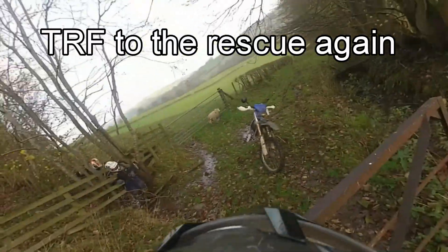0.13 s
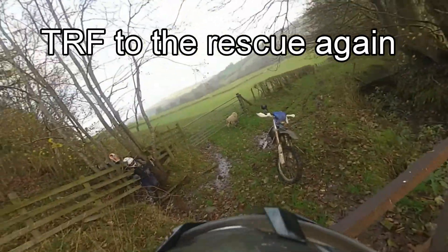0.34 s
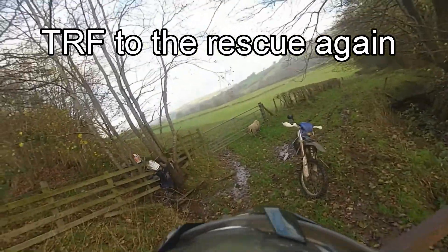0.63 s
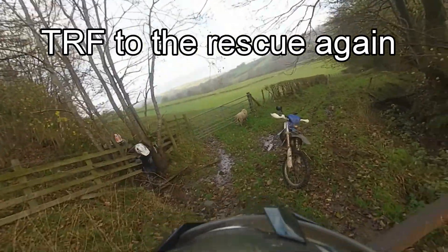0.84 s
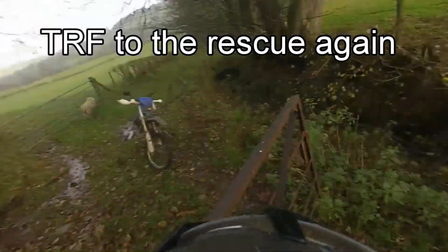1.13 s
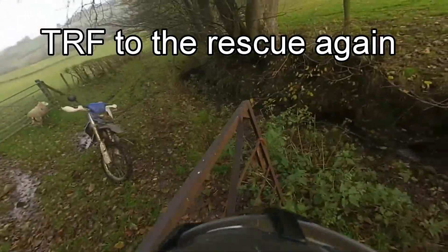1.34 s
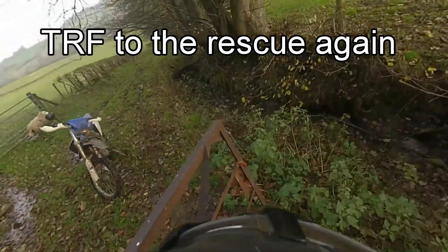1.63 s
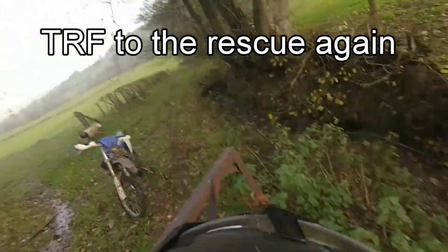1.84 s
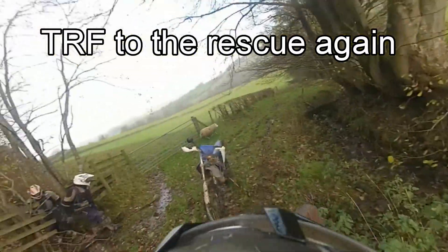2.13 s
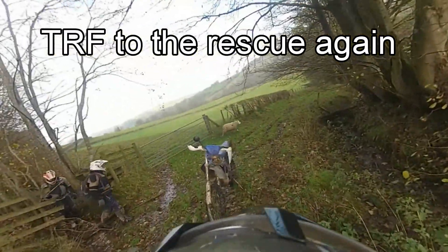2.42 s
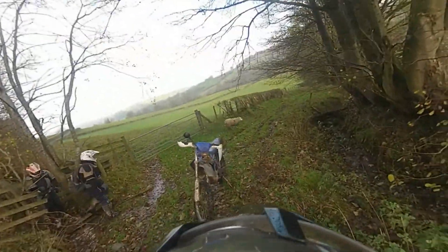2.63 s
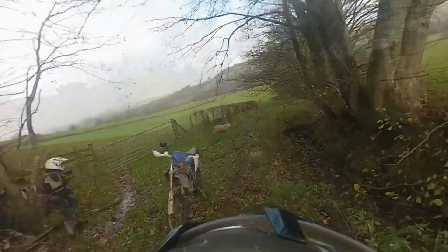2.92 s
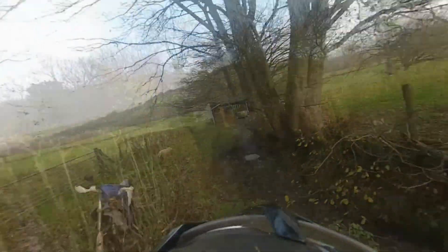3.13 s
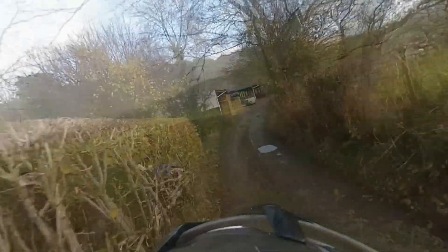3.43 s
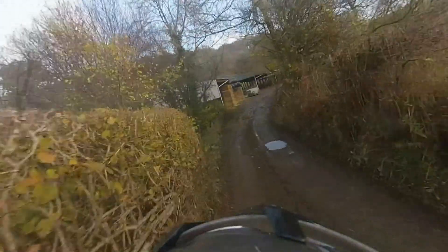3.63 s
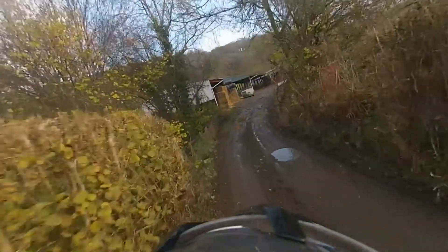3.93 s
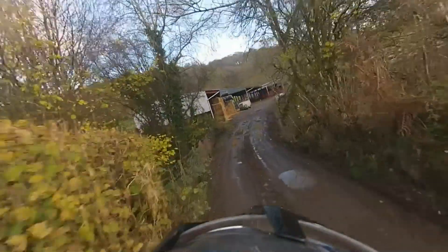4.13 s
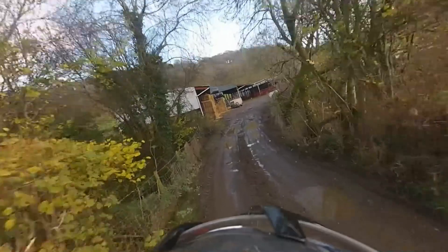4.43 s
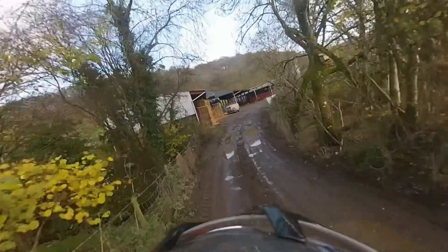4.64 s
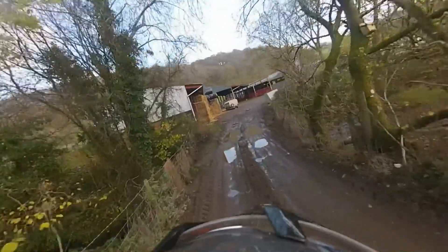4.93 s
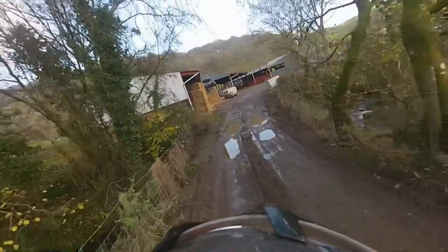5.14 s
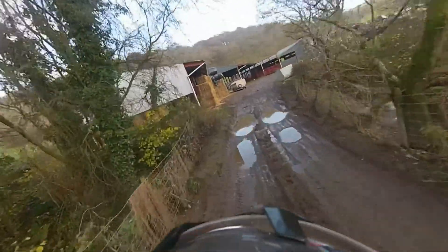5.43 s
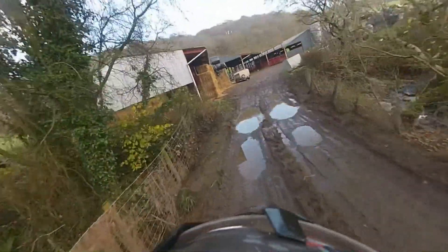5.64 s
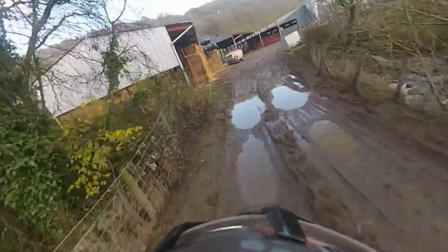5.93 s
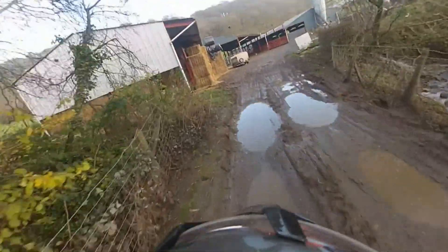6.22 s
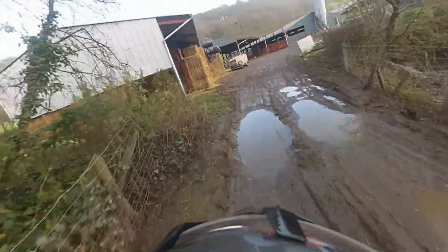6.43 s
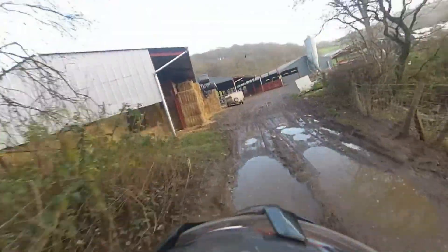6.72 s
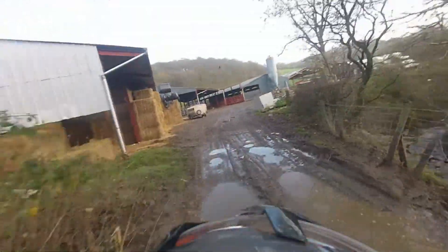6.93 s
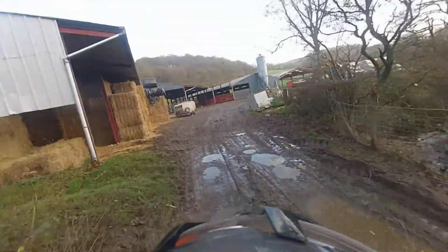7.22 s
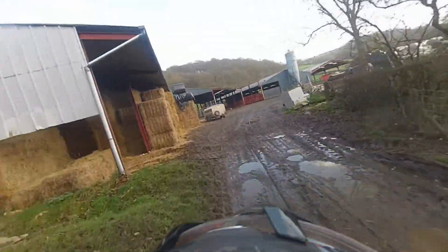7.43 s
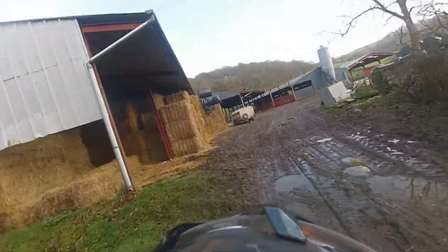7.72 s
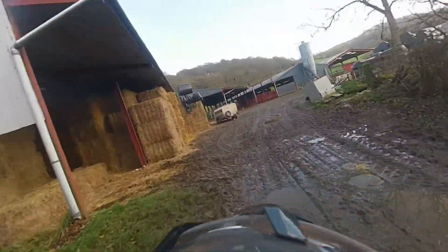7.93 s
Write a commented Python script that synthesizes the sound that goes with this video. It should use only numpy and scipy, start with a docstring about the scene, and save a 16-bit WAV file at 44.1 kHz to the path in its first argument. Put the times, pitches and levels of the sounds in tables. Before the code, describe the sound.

Lumpy motorcycle idle with soft clatter for three seconds, then quickening puffs, tyre rumble and a deepening, laboring low-speed chug.

```python
"""A single-cylinder four-stroke trail motorcycle idles unevenly, then pulls away and chugs along a wet farm track.
Each firing sends pressure waves down the pipe, as a double puff under load; weak firings break the beat.
Knocks and ticks at fixed points of the engine cycle ring the case, and noise pulsing with them is the clatter.
Tyre rumble and wind grow as the bike pulls away; gusts, rattles and jolts come at set times.
A helmet camera in a closed housing hears it all, muffled."""
import sys
import numpy as np
from scipy import signal
from scipy.fft import rfft, irfft, next_fast_len
from scipy.io import wavfile

SR = 44100
rng = np.random.default_rng(int(sys.argv[2]) if len(sys.argv) > 2 else 0)


def wav_record(signal):
    """Record a signal, one row per channel, as 16-bit PCM in the file named by sys.argv[1]."""
    frames = np.transpose(np.atleast_2d(signal))
    bounded = np.clip(frames, -1, 1)
    # unit amplitude maps onto the largest positive 16-bit level
    quanta = np.round(bounded * 32767).astype(np.int16)
    wavfile.write(sys.argv[1], SR, quanta)


N = 355887
TIME = np.arange(N) / SR

# Engine speed. Each row: time in seconds, firings per second.
ENGINE_SPEED = [(0.0, 16.22), (0.5, 17.23), (1.0, 17.17), (1.32, 15.6), (1.5, 16.28), (3.14, 16.97),
                (3.2, 16.37), (3.38, 20.38), (4.5, 20.56), (4.64, 19.9), (5.12, 19.93), (5.42, 18.79),
                (5.52, 19.42), (6.28, 18.01), (6.78, 18.47), (7.04, 16.79), (7.46, 17.68), (8.07, 17.14)]
# Firings that burn badly. Each row: time in seconds, change of strength in dB.
WEAK_FIRINGS = [(0.11, -4), (0.41, -7), (0.64, -3.1), (0.7, -6.5), (0.93, -6), (1.23, -9), (1.35, -16),
                (2.03, -9), (2.39, -15), (2.93, -5.1), (3.43, -8), (3.73, -9), (3.83, -3.5), (3.97, -6.5),
                (4.12, -6.5), (4.22, -3), (4.31, -3), (4.51, -4.5), (4.71, -7), (5.01, -4.5), (5.11, -4),
                (5.37, -5), (5.94, -3), (6.16, -4.5), (6.33, -1.5), (6.66, -3), (6.93, -3.5)]
# The rider's hand. Each row: time in seconds, exhaust level in dB with the throttle open,
# lugging from 0 (light) to 1 (hard).
THROTTLE = [(3.0, -31, 0), (3.25, -36.5, 0), (3.55, -33, 0.04), (4.0, -30, 0), (5.0, -30, 0.09),
            (5.6, -31, 0.03), (6.2, -28.5, 0.37), (6.8, -25.5, 0.59), (7.12, -27, 0.43), (7.3, -25, 0.73),
            (7.9, -26, 0.83), (8.07, -27, 0.85)]
# Pressure waves of one idle firing, in order. Each entry: average height, the first being 1.
IDLE_WAVES = [1, 0.4, 0.6, 0.35, 0.22]
# Sharp waves that bark at idle. Each row: delay after the first in seconds, relative level in dB.
BARK_WAVES = [(0, 3.5), (.0091, 1.5), (0.016, -11.5)]
# Puffs of one firing under load: a puff of intake just before, blow-down, the piston's push, a last gasp. Each
# row: place as a share of the engine cycle, relative level in dB.
PUFFS = [(-.13, -16.5), (0, 0.5), (.248, -1.5), (0.484, -14.5)]
# Parts that meet in each engine cycle. Each row: place as a share of the cycle (above one half it
# falls before the firing time), then relative levels in dB: knock at idle, knock under load, tick.
CONTACTS = [(.69, -7.5, -13, 4.5), (.75, -4.5, -10.5, -5.5), (.83, -6.5, -17, -2), (0.0996, -5, -9.5, 2.5),
            (.33, -5, -6.5, -7)]
# Clatter of engine and chain. Each row: time in seconds, level in dB.
CLATTER_LEVEL = [(0, -54), (2.95, -53.5), (3.8, -46), (4.8, -44.5), (5.55, -47), (6.3, -45), (6.8, -42),
                 (7.3, -44), (7.8, -39.5), (8.07, -43)]
# Small rattles of the bike. Each row: time in seconds, level in dB before a shared cut, decay in seconds.
RATTLES = [(1.629, -35, 0.0061), (1.65, -40, .01), (1.668, -40.5, .014), (4.973, -34, 0.0074),
           (5.3009, -35, .012), (7.0504, -27, .005), (7.791, -32, 0.015)]
# Jolts over ruts. Each row: time in seconds, level in dB.
JOLTS = [(7.632, -23), (7.787, -20)]
# Gusts on the helmet. Each row: time of the peak in seconds, half-length in seconds, peak level in dB.
GUSTS = [(1.057, 0.093, -45), (2.22, .05, -51), (4.75, 1.0, -39.5)]

# Resonances: tones that ring when struck. Each row: pitch in Hz, width in Hz, relative level in dB.
# The pipe at idle, then the idle bark and the broad band that shapes it:
IDLE_MODES = [(78, 21, 7.5), (141, 45, 3.5), (216, 34, -8.5)]
BARK_MODES = [(426, 96, 0), (518, 76, -1)]
BARK_BAND = [(482, 270, 0)]
# The exhaust pulling lightly, the exhaust lugging hard, and its rushing gas (same columns):
LIGHT_MODES = [(89.4, 45, -9), (170.5, 37.5, -1), (260.5, 53, -1.5), (314, 40, -3), (466, 33, -10.5)]
LUG_MODES = [(86, 60, -4.5), (140, 73, -6.5), (241.3, 48.4, 4.5), (293.4, 94, -1), (454, 160, -11)]
GAS_MODES = [(352, 50, 1), (481, 32, 2.5), (583, 96, -9)]
# The engine case, the bright valve ticks, the loose parts and the jolted frame (same columns):
CASE_MODES = [(463, 35, -4.5), (551, 30, 0.5), (621.6, 54, -8), (844, 51, -14.5)]
TICK_MODES = [(1870, 690, 3.5), (2850, 340, 11)]
RATTLE_MODES = [(1380, 440, 8.2), (2000, 600, 2.5), (2580, 200, 9.6), (4040, 850, 2)]
JOLT_MODES = [(250.3, 140, 4), (470, 170, -1), (900, 300, -22)]

# Noise colours. Each row: frequency in Hz, relative strength there in dB.
# Clatter at a standstill, clatter when rolling, ground rumble, and wind:
IDLE_CLATTER = [(500, 6), (900, -3.5), (1200, 4), (1600, -3), (2100, 3), (2500, -2), (2850, 0), (3300, -4),
                (4500, -5), (5500, -9.5), (7000, -30)]
ROLL_CLATTER = [(500, -23), (900, -9.5), (1300, 3.5), (1550, -0.5), (2100, 2.5), (2500, 1), (2850, 7.5),
                (3400, -2), (4700, -1.5), (5500, -9), (7000, -37)]
RUMBLE = [(30, -78), (70, -9), (120, -1.5), (170, -0.5), (300, -3.5), (400, -3), (500, -11.5), (650, -12.5),
          (800, -20), (1200, -27.5)]
WIND = [(12, -5), (25, -13), (42, -1.5), (65, -7), (130, -11), (400, -41)]

# The throttle opens and the bike gets rolling: start and length (s)
OPEN_S, OPENING_S = 2.755, 0.84
ROLL_OFF_S, GATHERING_S = 2.84, 0.65
# Chance spread of every firing (dB)
FIRING_SPREAD_DB = .5
# Under load each firing makes up for this share of the last one's lack or excess, so the beat see-saws
REBOUND = 0.33
# Rate of the pipe's bouncing waves (Hz), and turbulence in the pipe (0-1), both at idle
IDLE_PIPE_HZ, RAGGED_IDLE = 133.1, 0.39
# Hollow beat at idle, the change of beat and bark as the throttle opens, and engine knock (dB)
BEAT_DB, BEAT_OPEN_DB, KNOCK_DB = -34, -13, -41.5
# Chance spread of the puffs in time (s) and level (dB)
PUFF_JITTER_S, PUFF_SPREAD_DB = .00018, .7
# Above the idle rate (firings per s) the puffs come earlier (s for each extra firing per s)
IDLE_RATE, ADVANCE_S = 17.0, 0.00187
# Ground rumble at a standstill, the tyre rumble added under way, and air on the helmet when riding (dB)
STANDING_RUMBLE_DB, TYRES_DB, RIDE_WIND_DB = -45.5, -36, -45
# The camera's mirror point and top limit (Hz)
MIRROR_HZ, CUTOFF_HZ = 12000, 15400


def from_db(db):
    """Turn decibels into gain."""
    return 10 ** (np.asarray(db) / 20)


def rms_one(x):
    """Scale to an rms (average strength) of 1."""
    return x / np.sqrt(np.mean(x ** 2) + 1e-20)


def in_time(rows):
    """Draw each column of a timed table as a smooth line, sample by sample."""
    s, *columns = np.transpose(rows)
    return [np.interp(TIME, s, column) for column in columns]


def ramp(start_s, length_s):
    """Rise evenly from 0 to 1."""
    return np.clip((TIME - start_s) / length_s, 0, 1)


def opening():
    """How far the throttle is open, 0-1."""
    return ramp(OPEN_S, OPENING_S)


def rolling():
    """How far the bike has got under way, 0-1."""
    return ramp(ROLL_OFF_S, GATHERING_S)


def low_pass(x, hz, order=2):
    """Take away the sound above a frequency (Butterworth filter)."""
    return signal.sosfilt(signal.butter(order, min(hz, .45 * SR), fs=SR, output="sos"), x)


def drift(hz):
    """Slow random wandering with a spread of 1."""
    settling = SR  # the filter's first second is thrown away
    return rms_one(low_pass(rng.standard_normal(N + settling), hz)[settling:])


def noise(colour):
    """Random noise of rms 1 with a given spectrum."""
    hz, db = np.transpose(colour)
    size = next_fast_len(N)
    bins_hz = np.maximum(np.arange(size // 2 + 1) * SR / size, 1)
    gain = from_db(np.interp(np.log(bins_hz), np.log(hz), db, right=-120))
    spectrum = rfft(rng.standard_normal(size)) * gain
    return rms_one(irfft(spectrum, size)[:N])


def clicks(times, sizes):
    """Single-moment clicks, each shared between its two nearest samples."""
    at = np.clip(np.ravel(times) * SR, 0, N)
    first, sizes = at.astype(int), np.ravel(sizes)
    early = np.bincount(first, sizes * (1 - at + first), N + 2)
    late = np.bincount(first + 1, sizes * (at - first), N + 2)
    return (early + late)[:N] + 1e-18


def ringing_poles(hz, width_hz):
    """Filter numbers of one resonance, and how much it keeps from sample to sample."""
    r = np.exp(-np.pi * width_hz / SR)
    return [1, -2 * r * np.cos(2 * np.pi * hz / SR), r * r], r


def resonate(x, modes):
    """Ring several resonances side by side, with alternating signs."""
    out = 0
    for k, (hz, width_hz, db) in enumerate(modes):
        poles, r = ringing_poles(hz, width_hz)
        gain = (-1) ** k * from_db(db) * (1 - r * r) / 2
        out = out + gain * signal.lfilter([1, 0, -1], poles, x)
    return out


def disperse(x, hz, width_hz):
    """The silencer chambers delay one band more than the rest: waves spread but keep their colour."""
    poles, _ = ringing_poles(hz, width_hz)
    return signal.lfilter(poles[::-1], poles, x)


def fade(x, seconds):
    """Give every click a tail that dies away exponentially."""
    return signal.lfilter([1], [1, -np.exp(-1 / (seconds * SR))], x)


def trail(x, seconds):
    """A dying puff of noise after every click."""
    return fade(x, seconds) * rng.standard_normal(N) / np.sqrt(seconds * SR)


def firings():
    """Time, cycle length and strength of each firing; under load a weak one leaves fuel for the next."""
    rate, = in_time(ENGINE_SPEED)
    cycles = np.cumsum(rate) / SR
    times = np.interp(np.arange(150) + .75, cycles, TIME, right=N / SR)
    db = rng.normal(0, FIRING_SPREAD_DB, len(times))
    for s, weak_db in WEAK_FIRINGS:
        db[np.argmin(abs(times - s))] += weak_db
    rebound = np.clip(REBOUND, 0, .9) * np.interp(times, TIME, opening())
    for k in range(1, len(times)):
        db[k] -= rebound[k] * db[k - 1]
    strength = from_db(db) * (times < TIME[-1])  # firings past the end are silent
    return times, 1 / np.interp(times, TIME, rate), strength


def pipe_waves(times, heights, scatter=.05, gas_noise=.45, gas_s=.003):
    """Each blow-down bounces along the pipe; turbulence shifts the waves and trails them with noise."""
    trips_s = np.exp(scatter * RAGGED_IDLE * rng.standard_normal(heights.shape)) / IDLE_PIPE_HZ
    arrivals = times[:, None] + np.cumsum(trips_s, axis=1) - trips_s[:, :1]
    sizes = heights * np.exp(.2 * RAGGED_IDLE * rng.standard_normal(heights.shape))
    waves = clicks(arrivals, sizes)
    return waves + gas_noise * RAGGED_IDLE * trail(waves, gas_s)


def idle_beat(times, strength, lead_s=0.00312):
    """The hollow beat of a closed throttle: bouncing waves ring the pipe, softer as the throttle opens."""
    waves = pipe_waves(times - lead_s, np.outer(strength, IDLE_WAVES))
    beat = rms_one(low_pass(resonate(waves, IDLE_MODES), hz=416, order=4))
    return from_db(BEAT_DB + BEAT_OPEN_DB * opening()) * beat


def idle_bark(times, strength, lead_s=0.00221, jitter_s=.0001, level_db=-41):
    """The first, sharp waves of an idle firing ring higher up as a bark, softer as the throttle opens."""
    delay_s, db = np.transpose(BARK_WAVES)
    at = times[:, None] - lead_s + delay_s + rng.normal(0, jitter_s, (len(times), len(db)))
    waves = clicks(at, strength[:, None] * from_db(db))
    bark = resonate(resonate(waves, BARK_MODES), BARK_BAND)
    return from_db(level_db + BEAT_OPEN_DB * opening()) * rms_one(low_pass(bark, hz=700, order=4))


def engine_contacts(times, cycle_s, jitter_s=.0005, spread_db=1.4):
    """Piston slap and valve seating recur at fixed crank angles: clicks for dull knocks and bright ticks."""
    share, idle_db, load_db, tick_db = np.transpose(CONTACTS)
    shape = (len(times), len(share))
    nearest_share = share - np.round(share)
    at = times[:, None] + cycle_s[:, None] * nearest_share + rng.normal(0, jitter_s, shape)
    sizes = from_db(rng.normal(0, spread_db, shape)) * (times < TIME[-1])[:, None]
    opened = np.interp(times, TIME, opening())[:, None]
    knock_db = idle_db + opened * (load_db - idle_db)
    return clicks(at, sizes * from_db(knock_db)), clicks(at, sizes * from_db(tick_db))


def engine_knock(contacts, chatter=.35, chatter_s=.005):
    """The contacts chatter briefly and ring the engine case."""
    blows = contacts + chatter * trail(contacts, chatter_s)
    return from_db(KNOCK_DB) * rms_one(low_pass(resonate(blows, CASE_MODES), hz=1030, order=4))


def valve_ticks(contacts, tick_db=-59.5):
    """The contacts also give a short bright rasp of ringing noise."""
    rasp = fade(abs(contacts), .007) * rng.standard_normal(N)
    return from_db(tick_db) * rms_one(resonate(rasp, TICK_MODES))


def clatter(contacts, swell_s=0.024, idle_swell=0.45, roll_swell=0.64, grain_db=1.0):
    """Gear hiss pulses with the engine; once rolling, chain and wet grit give a grainier noise."""
    clatter_db, = in_time(CLATTER_LEVEL)
    beat = rms_one(fade(abs(contacts), swell_s))
    standing = rms_one(noise(IDLE_CLATTER) * np.hypot(1, idle_swell * beat))
    grain = from_db(grain_db * drift(hz=164))
    moving = rms_one(noise(ROLL_CLATTER) * np.hypot(1, roll_swell * beat) * grain)
    # square roots keep the power steady while one noise replaces the other
    return from_db(clatter_db) * (np.sqrt(1 - rolling()) * standing + np.sqrt(rolling()) * moving)


def ground_rumble(bump_db=1.5):
    """Low, bumpy noise from the ground; knobbly tyres add to it as the bike gets under way."""
    level = from_db(STANDING_RUMBLE_DB) + rolling() * from_db(TYRES_DB)
    return level * rms_one(noise(RUMBLE) * from_db(bump_db * drift(hz=25)))


def wind(gust_db=-4.5):
    """Air buffets the helmet as low, wavering noise, in gusts and as the bike moves."""
    gusts = sum(from_db(db) * np.exp(-((TIME - s) / half_s) ** 2) for s, half_s, db in GUSTS)
    air = rolling() * from_db(RIDE_WIND_DB) + gusts
    return air * rms_one(noise(WIND) * from_db(gust_db * drift(hz=4.2)))


def rattles(level_db=-9):
    """Loose parts clack and scuff: short fading bursts of ringing noise."""
    shake = sum(fade(clicks([s], [from_db(db + level_db)]), scuff_s) for s, db, scuff_s in RATTLES)
    return shake * rms_one(resonate(rng.standard_normal(N), RATTLE_MODES))


def exhaust(times, cycle_s, strength, lead_s=0.004245, gas_s=0.021, gas_db=-10):
    """Under load each firing puffs into the silencer, which booms when lugging; rushing gas roughens it."""
    pull_db, lug = in_time(THROTTLE)
    lug = np.clip(lug, 0, 1)
    share, db = np.transpose(PUFFS)
    shape = (len(times), len(share))
    opens = times - lead_s - ADVANCE_S * (1 / cycle_s - IDLE_RATE)
    at = opens[:, None] + cycle_s[:, None] * share + rng.normal(0, PUFF_JITTER_S, shape)
    puffs = clicks(at, strength[:, None] * from_db(db + rng.normal(0, PUFF_SPREAD_DB, shape)))
    spread = disperse(puffs, hz=268.5, width_hz=105)

    def voice(x, modes):
        """Ring the exhaust and soften it to an rms of 1."""
        return rms_one(low_pass(resonate(x, modes), hz=675, order=4))

    light = voice(spread, LIGHT_MODES)
    hard = voice(spread, LUG_MODES)
    gas = voice(trail(puffs, gas_s), GAS_MODES)
    return opening() * from_db(pull_db) * (from_db(gas_db) * gas - (1 - lug) * light - lug * hard)


def jolts(thud_s=0.011):
    """The frame thuds over ruts: fading bursts of low ringing noise."""
    s, db = np.transpose(JOLTS)
    shake = fade(clicks(s, from_db(db)), thud_s)
    return shake * rms_one(low_pass(resonate(rng.standard_normal(N), JOLT_MODES), hz=1100, order=4))


def scene():
    """The bike and the track, heard from the rider's helmet."""
    times, cycle_s, strength = firings()
    knocks, ticks = engine_contacts(times, cycle_s)
    engine = idle_beat(times, strength) + idle_bark(times, strength) + exhaust(times, cycle_s, strength)
    engine = engine + engine_knock(knocks) + valve_ticks(ticks)
    surroundings = ground_rumble() + wind()
    return (engine + clatter(ticks) + rattles() + jolts() + surroundings)[None]


def record(dry, mirror_db=7.0):
    """The camera keeps a narrow band; its resampling mirrors a thin copy around 12 kHz; the top is cut."""
    narrow = low_pass(dry, hz=5550, order=10)
    thin = np.diff(narrow, prepend=0)
    mirror = low_pass(thin * np.cos(2 * np.pi * MIRROR_HZ * TIME), hz=10300, order=1)
    top_cut = signal.ellip(10, .2, 90, CUTOFF_HZ, fs=SR, output="sos")
    return signal.sosfilt(top_cut, narrow + from_db(mirror_db) * mirror)


dry = scene()
out = record(dry)
wav_record(out)
```